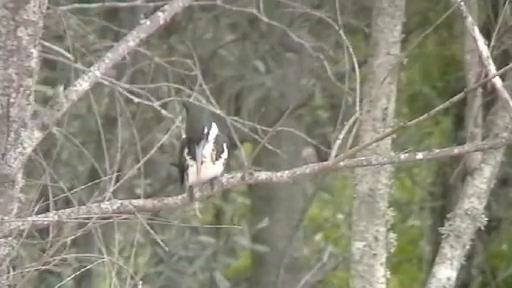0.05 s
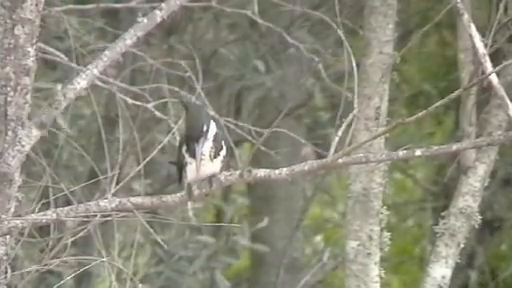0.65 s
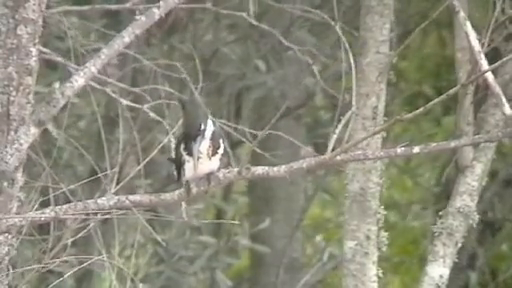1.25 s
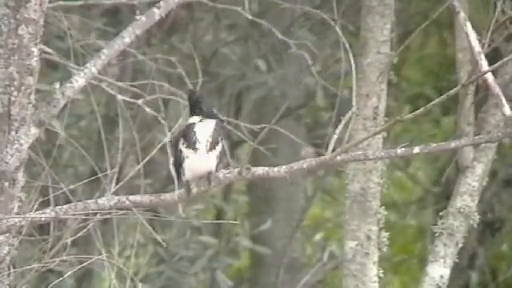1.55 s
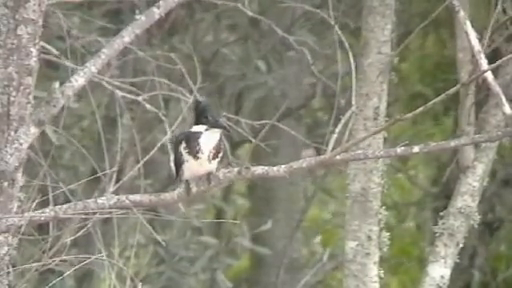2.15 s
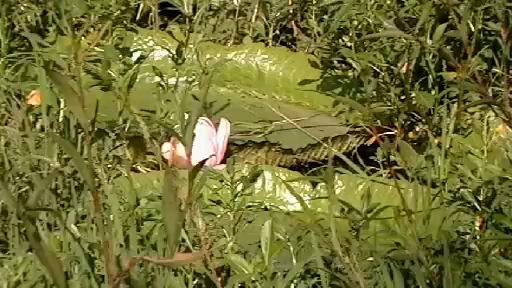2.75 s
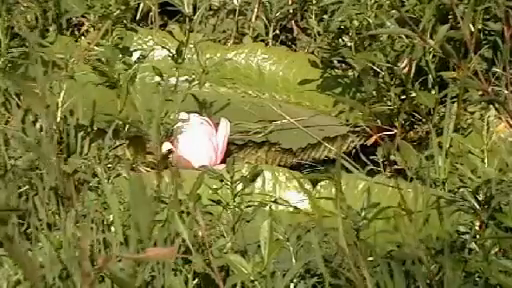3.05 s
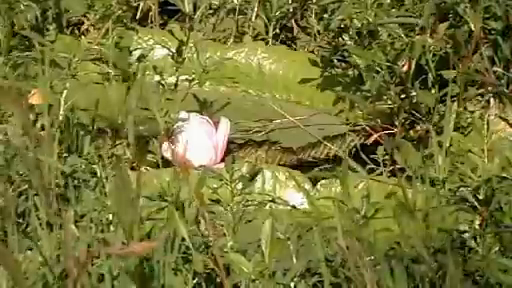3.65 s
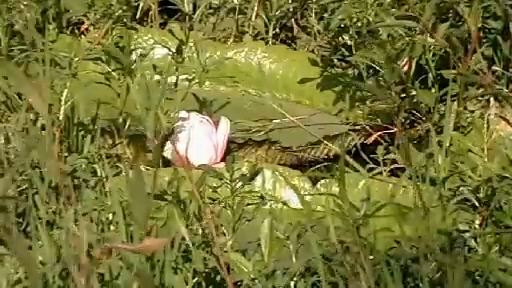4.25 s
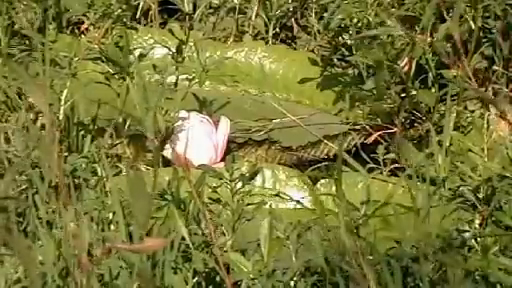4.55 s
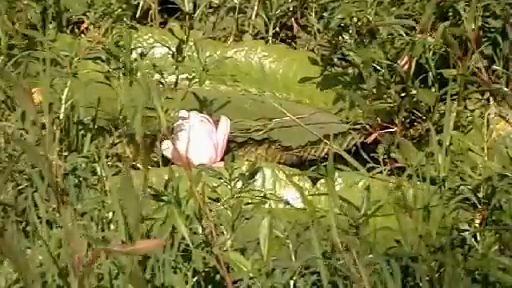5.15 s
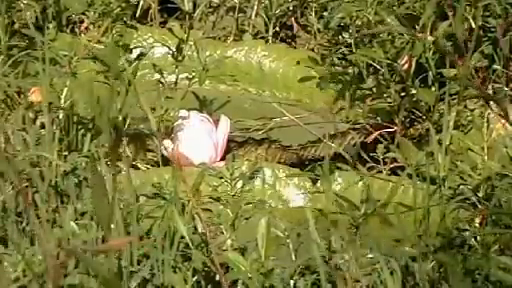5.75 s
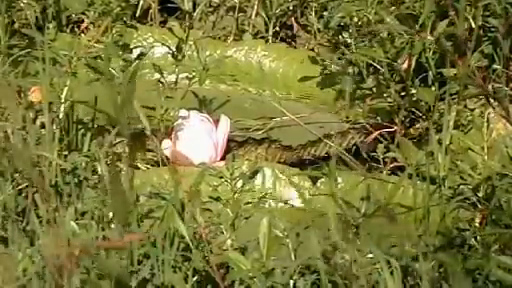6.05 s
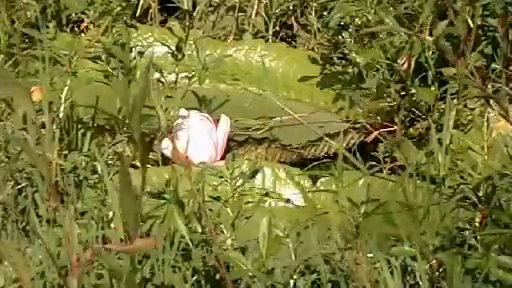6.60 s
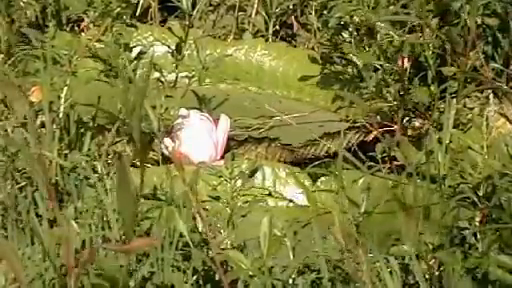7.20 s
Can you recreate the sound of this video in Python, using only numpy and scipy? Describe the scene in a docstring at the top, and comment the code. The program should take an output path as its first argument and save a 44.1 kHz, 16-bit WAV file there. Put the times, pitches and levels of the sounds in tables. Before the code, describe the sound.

The sound opens quietly among trees on a river bank, with a distant insect chorus making a steady, high hiss over soft outdoor air. At about 1.7 seconds a bird gives one short, harsh chirp that stands out clearly. Near 2.7 seconds everything cuts out for an instant.

Then, by the water, a close insect buzzes louder, very high and rapidly pulsing, over a rasping chorus until the end at about 7.5 seconds. Wind hits the microphone with low rumbles and thumps, loudest from 2.8 to 3.6 seconds, lighter around 4.3, and returning in uneven gusts from 5.1 to 6.7. A far bird whistles a faint run of quickening, falling notes from about 2.8 to 5 seconds, and others add two soft downward slides. A katydid gives brief, thin lisps a little more than once a second. A faint camera motor whine runs through both places.

```python
"""A far insect chorus hisses among trees on a river bank, and a bird gives one harsh chirp by snapping
its voice box. After a brief silence we are by the water lilies: a close insect buzzes as a muscle
clicks its ribs, others rasp, a katydid lisps with its wings and small birds whistle far off.
Gusts rumble as swirls of air hit the microphone.
The faint whine of the camera's motor runs through both spots."""
import sys
import numpy as np
from scipy import signal
from scipy.fft import rfft, irfft, next_fast_len
from scipy.io import wavfile
from scipy.ndimage import uniform_filter1d

SR = 44100
rng = np.random.default_rng(int(sys.argv[2]) if len(sys.argv) > 2 else 0)


def store_pcm(level_fs):
    """Save levels as 16-bit WAV."""
    pcm = np.round(np.clip(level_fs, -1, 1) * 32767).astype(np.int16)
    wavfile.write(sys.argv[1], SR, np.atleast_2d(pcm).T)


N = 329427
T = np.arange(N) / SR
FFT_SIZE = next_fast_len(N, real=True)
FREQS = np.maximum(np.arange(FFT_SIZE // 2 + 1) * SR / FFT_SIZE, 1)

# WOOD is the spot among the trees, POND the one by the lilies.
# A relative_db column gives only a shape; the overall loudness is set where it is used.
# Far air, water and leaves: pitch_hz, level_db_per_hz
WOOD_AIR = [(25, -104), (70, -89.5), (130, -99), (200, -82.5), (300, -91.5), (360, -84.5), (460, -81),
            (590, -87.5), (750, -84), (1400, -86.5), (2500, -90), (4700, -97), (5400, -105), (6200, -105),
            (11000, -101), (16000, -113)]
POND_AIR = [(25, -99), (90, -72), (170, -85), (320, -88.5), (570, -89), (730, -85), (1000, -89),
            (3500, -94), (4450, -87.5), (4950, -104), (5600, -107), (7000, -94), (10500, -106),
            (11300, -93.5), (12400, -92), (13800, -97), (16000, -92)]
# Far insect choruses: pitch_hz, level_db_per_hz
WOOD_CHORUS = [(5400, -115), (6200, -84), (6750, -77), (7250, -89), (7900, -84.5), (8600, -86), (9000, -92),
               (9700, -112)]
POND_CHORUS = [(5600, -112), (6100, -89.5), (6300, -99), (7000, -89.5), (7400, -78), (7680, -68.5),
               (7880, -73), (8055, -62), (8180, -70), (8300, -63.5), (8550, -77.5), (9020, -89),
               (9250, -82.5), (9550, -83.5), (10200, -108)]
# How wide the far sounds spread in stereo: pitch_hz, side_minus_mid_db
WOOD_WIDTH = [(60, -12), (380, -17.5), (700, -12), (4400, -10.5), (7000, -13.5), (15000, -11)]
POND_WIDTH = [(100, -8), (380, -12), (1300, -5), (2800, -9.5), (4400, -8), (6600, -2), (8200, -10.5),
              (9400, -2), (15000, -3)]
# Tones of the camera's motor: pitch_hz, wood_level_db, pond_level_db
WHINE_TONES = [(1499, -63.5, -66.5), (1798, -82, -67.5), (2098, -68.5, -66), (2547, -71, -75),
               (3297, -77, -76)]
# A lower chorus joining in among the trees: time_s, relative_db
LOW_CHORUS_LEVEL = [(0, -9), (.9, -6), (1.3, -0.5), (2.0, 1.5), (2.75, -3)]
# Where the far raspers' bodies ring: pitch_hz, width_hz, relative_db
RASP_BODY = [(6495, 200, 1.5), (6840, 190, 0.5)]
# A far bird's run of notes, softer in the middle: time_s, level_db
RUN_LEVEL = [(2.75, -55), (3.05, -54), (3.35, -60), (3.6, -61), (3.85, -59.5), (4.55, -61.5), (4.82, -57),
             (5.03, -56.5)]
# Long sliding notes of other birds: start_s, length_s, start_hz, end_hz, level_db
SLIDES = [(4.44, .22, 4130, 3600, -59), (7.34, 0.18, 2004, 1850, -57)]
# Katydid lisps: start_s, length_s, relative_db
LISPS = [(2.74, 0.21, -48.5), (3.40, 0.13, -47.5), (3.98, 0.16, -53), (4.598, 0.088, -45.5),
         (5.27, .135, -50), (6.055, 0.11, -49.5), (6.81, 0.14, -53), (7.40, .12, -56)]
# Tone colour of the wind's rumble: pitch_hz, relative_db
RUMBLE_COLOUR = [(20, -32), (50, -18), (90, -3.5), (150, -1.5), (220, 2.2), (320, -6.5), (450, -12.5),
                 (600, -20), (1000, -25), (1600, -33), (3000, -51)]
# How much the rumble differs between left and right: pitch_hz, relative_db
RUMBLE_WIDTH = [(40, -1), (130, 0), (260, -2), (500, 0.5), (1500, -0.5)]
# Gusts on the microphone: start_s, hold_s, strength_db
GUSTS = [(0.677, .015, -60.5), (.78, .02, -59), (0.976, .02, -55.5), (2.778, 0.06, -29),
         (2.844, 0.11, -24.5), (2.933, 0.16, -29), (3.173, 0.42, -32.5), (3.68, 0.13, -43),
         (4.155, 0.22, -45.5), (4.338, 0.1, -40), (4.54, 0.68, -51.5), (5.138, .05, -36.5),
         (5.195, 0.26, -34), (5.686, .04, -41), (5.738, 0.033, -36), (5.855, 0.37, -42.5),
         (5.948, 0.15, -36.5), (6.368, 0.2, -42), (6.556, 0.13, -39.5), (7.233, 0.03, -55),
         (7.427, 0.015, -40.5)]
# Single swirls of air that slap the microphone: start_s, level_db
PUFFS = [(2.898, -28), (3.005, -33), (3.095, -28.5), (3.26, -38), (3.605, -39), (3.927, -37.5),
         (5.255, -39), (5.762, -35.5)]
# Tone colour of those puffs: pitch_hz, relative_db
PUFF_COLOUR = [(30, -32), (110, -11), (230, 8.5), (400, 0), (900, -12), (1600, -15), (3500, -60),
               (16000, -90)]
# Where the chirping bird's throat rings: pitch_hz, width_hz, relative_db
THROAT = [(1400, 300, -14.5), (2200, 200, -.5), (2780, 480, -1.5), (3580, 250, -10), (4400, 400, -21),
          (5150, 400, -22)]
# The chirp's two clear beats: start_s, hold_s, level_db
CHIRP_BEATS = [(1.6865, .004, -30.5), (1.7035, .003, -24)]
# The weaker rattle under those beats: time_s, relative_db
RATTLE_LEVEL = [(1.674, -39), (1.688, -28.5), (1.693, -41), (1.697, -32.5), (1.707, -31), (1.714, -39),
                (1.721, -39), (1.735, -52)]
# Where the buzzing insects' bodies ring: pitch_hz, width_hz, relative_db
WOOD_BODY = [(8620, 93, 0)]
POND_BODY = [(8090, 93, 0.5), (8370, 180, 3), (8560, 430, -12)]
# Pace of their buzzing muscles: time_s, strokes_per_s
WOOD_PACE = [(0, 66.5)]
POND_PACE = [(2.75, 62.62), (4.7, 62.6), (5.6, 62.48), (7.47, 62.25)]
# How the buzz grows and fades: time_s, relative_db
WOOD_BUZZ_LEVEL = [(0, -54), (.5, -55), (1.1, -55), (1.45, -49.5), (1.75, -51.5), (1.9, -60), (2.75, -59)]
POND_BUZZ_LEVEL = [(2.75, -39), (4.1, -38), (4.25, -42), (4.9, -39), (5.0, -41), (5.75, -39.5),
                   (6.05, -41.5), (6.3, -38), (6.5, -41), (6.88, -39.5), (7.1, -41), (7.47, -39)]
# Brief chance peaks in the loudness of the steady close buzz: time_s, boost_db
BUZZ_PEAKS = [(4.767, 4), (4.895, 4.5), (5.742, 4.5), (5.807, 3.5)]


def undb(db):
    """Turn decibels into a number to multiply by."""
    return 10 ** (np.asarray(db) / 20)


def unit(x):
    """Scale a sound to an average power of 1."""
    return x / np.sqrt(np.mean(x ** 2) + 1e-20)


def curve(rows):
    """Join (time_s, value) rows by straight lines."""
    return np.interp(T, *np.transpose(rows))


def gains(rows):
    """Turn (pitch_hz, level_db) rows into a gain for every frequency."""
    hz, db = np.transpose(rows)
    return undb(np.interp(np.log(FREQS), np.log(hz), db))


def shape(x, response):
    """Filter a sound: multiply each frequency by its own gain."""
    return irfft(rfft(x, FFT_SIZE) * response, FFT_SIZE)[..., :N]


def white():
    """Plain, even hiss (white noise)."""
    return rng.standard_normal(N)


def wander(rate_hz):
    """A random drift, about 1 in size, that heads for a new value rate_hz times a second."""
    targets = rng.standard_normal(size=4096)
    return np.interp(T * rate_hz, np.arange(len(targets)), targets) * np.sqrt(3 / 2)


def swell(start_s, hold_s, db, rise_s, fall_s):
    """A loudness curve that builds up to start_s, holds, then dies away."""
    return undb(db) * np.exp(np.minimum(T - start_s, 0) / rise_s - np.maximum(T - start_s - hold_s, 0) / fall_s)


def ring(x, modes):
    """Let a sound ring a body at its own pitches; the result has power 1."""
    response = sum(undb(db) / (1 + 1j * (FREQS / hz - hz / FREQS) * hz / width) ** 2
                   for hz, width, db in modes)
    return unit(shape(x, response))


def stereo(mid, side):
    """Make left and right from what they share (mid) and how they differ (side)."""
    return np.array([mid + side, mid - side])


def echo(x, decay_s):
    """A blur of echoes from leaves and trunks that fades by 60 dB in decay_s."""
    t = T[:SR // 2]
    tail = rng.standard_normal(len(t)) * np.exp(-np.log(1000) * t / decay_s)
    return signal.fftconvolve(x, tail / np.linalg.norm(tail))[:N]


def outdoors(x, decay_s, echo_db, side_db):
    """Put the direct sound in the middle and its echoes around it."""
    return stereo(x + undb(echo_db) * echo(x, decay_s), undb(side_db) * echo(x, decay_s))


def far_hiss(spectrum, width, flicker_db, flicker_hz):
    """Countless far sources merge into a hiss; two sets of alternating bands flicker separately."""
    colour = gains(spectrum) * np.sqrt(SR / 2)
    octave_angle = np.pi * np.log2(FREQS)
    hiss = 0
    for bands in (np.cos(octave_angle), np.sin(octave_angle)):
        mid = shape(white(), colour * bands)
        side = shape(white(), colour * bands * gains(width))
        hiss = hiss + stereo(mid, side) * undb(flicker_db * wander(flicker_hz))
    return hiss


def motor_whine(column):
    """The camera's motor gives thin, slightly wavering tones; column picks the spot's levels."""
    whine = 0
    for row in WHINE_TONES:
        peak = np.sqrt(2) * undb(row[column] + 0.94 * wander(8.3))
        whine = whine + peak * np.sin(2 * np.pi * row[0] * T + 0.47 * wander(17))
    return whine


def low_chorus():
    """A thinner, lower insect chorus: a broad hiss with one narrow peak."""
    return ring(white(), [(5200, 3400, 0.5), (5170, 150, 2)]) * undb(curve(LOW_CHORUS_LEVEL) - 56)


def far_rasp(level_db=-61, side_db=-2, rough_db=4, rough_hz=65):
    """A few far insects rasp unevenly, pitched just below the main chorus."""
    mid, side = (ring(white(), RASP_BODY) * undb(rough_db * wander(rough_hz)) for _ in range(2))
    return stereo(mid, undb(side_db) * side) * undb(level_db)


def whistles(notes, bend, waver, flutter_db, echo_db):
    """Wavering, falling bird notes blurred by the trees; with bend over 1 they drop ever faster."""
    song = np.zeros(N)
    quiver = 1 + waver * wander(300)
    for start_s, length_s, start_hz, end_hz, db in notes:
        during = (T >= start_s) & (T < start_s + length_s)
        progress = np.clip((T[during] - start_s) / length_s, 0, 1)
        pitch_hz = (start_hz + (end_hz - start_hz) * progress ** bend) * quiver[during]
        arch = 2 * np.sqrt(progress * (1 - progress))
        song[during] += undb(db) * arch * np.sin(2 * np.pi * np.cumsum(pitch_hz) / SR)
    return outdoors(song * undb(flutter_db * wander(110)), decay_s=.25, echo_db=echo_db, side_db=-9)


def run_notes(start_s=2.748, count=10, first_gap_s=.284, gap_shrink_s=.0078, fall_ratio=.79):
    """List a bird's falling notes, which come ever sooner, shorter and lower."""
    lengths_s, pitches_hz = np.linspace(.097, .052, count), np.linspace(3210, 2970, count)
    notes = []
    for k, (length_s, hz) in enumerate(zip(lengths_s, pitches_hz)):
        level_db = np.interp(start_s, *np.transpose(RUN_LEVEL))
        notes.append((start_s, length_s, hz, hz * fall_ratio, level_db))
        start_s += first_gap_s - k * gap_shrink_s
    return notes


def far_birds():
    """One far bird sings a ragged run of steep notes; two others each slide evenly down."""
    run = whistles(run_notes(), bend=1.45, waver=.026, flutter_db=3.2, echo_db=-3.5)
    return run + whistles(SLIDES, bend=1, waver=.008, flutter_db=2.2, echo_db=-10)


def katydid(stroke_hz=110, depth=0.15, fade_s=0.074):
    """Quick wing strokes make short, very high lisps that swell and fade softly."""
    phrases = sum(undb(db) * np.clip(np.minimum(T - start, start + length - T) / fade_s + .5, 0, 1)
                  for start, length, db in LISPS)
    strokes = 1 + depth * np.sin(2 * np.pi * stroke_hz * T)
    rasp = ring(white() * strokes, [(11700, 3000, 0)]) * undb(-5)
    return stereo(rasp, undb(-4) * echo(rasp, decay_s=.05)) * phrases


def wind(brighten, shake_db, side, lean_left_db, calm_db=-71.5):
    """Swirls of air shake the microphone; stronger gusts shed smaller swirls, which sound higher."""
    strongest = np.max([swell(*gust, rise_s=0.022, fall_s=0.08) for gust in GUSTS], axis=0)
    gust_db = 20 * np.log10(strongest + undb(calm_db))
    noise = stereo(white(), side * shape(white(), gains(RUMBLE_WIDTH)))
    rumble = unit(shape(noise, gains(RUMBLE_COLOUR) / (1 + (FREQS / 3500) ** 4)))
    # split into swirl sizes at 165 Hz and 310 Hz
    large = shape(rumble, 1 / (1 + (FREQS / 165) ** 6))
    medium = shape(rumble, 1 / (1 + (FREQS / 310) ** 6)) - large
    small = rumble - large - medium
    tilt_db = brighten * np.clip(gust_db + 35, -12, 8)
    balance = undb(np.array([[lean_left_db], [-lean_left_db]]) / 2)
    swirls = (large * balance * undb(-1.2 * tilt_db)
              + medium * undb(0.53 * tilt_db)
              + small * undb(0.44 * tilt_db + 1.3 * wander(90)))
    return swirls * undb(gust_db + shake_db * wander(60))


def wind_puffs(hold_s=0.0055, side=0.64):
    """Single swirls slap the microphone: short puffs, brighter than the rumble."""
    loudness = sum(swell(start_s, hold_s, db, rise_s=0.0027, fall_s=0.014) for start_s, db in PUFFS)
    return unit(shape(stereo(white(), side * white()), gains(PUFF_COLOUR))) * loudness


def harsh_chirp(snap_hz=427.8, jitter=.15, rough=0.35, rasp_s=0.0024, tone_hz=2850):
    """Raspy snaps of a bird's voice box ring its throat; on two beats a clear tone breaks through."""
    start_s, end_s = RATTLE_LEVEL[0][0], RATTLE_LEVEL[-1][0]
    times_s = start_s + (np.arange(64) + jitter * rng.standard_normal(size=64)) / snap_hz
    hits = (times_s[times_s < end_s] * SR).astype(int)
    snaps = np.zeros(N)
    snaps[hits] = undb(curve(RATTLE_LEVEL))[hits]
    trails = signal.lfilter([1], [1, -np.exp(-1 / (rasp_s * SR))], snaps)
    rasp = rough * trails * white() / np.sqrt(rasp_s * SR / 2)
    rattle = ring(snaps + rasp, THROAT)
    # make it as strong as a pure tone that peaks at the loudest snap
    rattle *= snaps.max() / np.sqrt(2 * uniform_filter1d(rattle ** 2, size=130).max())
    beats = sum(swell(*beat, rise_s=0.00084, fall_s=0.00097) for beat in CHIRP_BEATS)
    tone = np.sin(2 * np.pi * np.cumsum(tone_hz * (1 + .025 * wander(500))) / SR)
    return outdoors(rattle + beats * tone, decay_s=0.22, echo_db=-15, side_db=-23)


def insect_buzz(pace, body, stroke_at_s, rib_hz, rib_db, uneven_db):
    """Each muscle stroke lets out a burst: one rib's clear ring plus dense clicks in the body."""
    stroke_hz = curve(pace) * (1 + .001 * wander(5))
    count = np.cumsum(stroke_hz) / SR
    # distance from the middle of the nearest stroke, in strokes; one is centred on stroke_at_s
    offset = (count - np.interp(stroke_at_s, T, count) + .5) % 1 - .5
    burst = np.exp(-.5 * (offset / .21) ** 4)  # flat-topped, about half a stroke long
    clicks = (rng.random(N) < 2500 / SR) * np.sign(white())  # about 2500 a second
    rib = np.sqrt(2) * np.sin(2 * np.pi * rib_hz * offset / stroke_hz + .5 * wander(40))
    song = ring(clicks, body) + undb(rib_db) * rib
    # the muscle gives every stroke nearly the same energy
    strength = np.sqrt(uniform_filter1d(song ** 2, size=300) + 1e-9)
    return unit(song / strength * burst * undb(uneven_db * wander(stroke_hz.mean())))


def close_insect(peak_reach_s=.012):
    """The insect by the lilies buzzes steadily, with a few brief chance peaks in loudness."""
    buzz = insect_buzz(POND_PACE, POND_BODY, stroke_at_s=4.895, rib_hz=8300, rib_db=-1.5, uneven_db=1.4)
    boost_db = sum(db * np.exp(-((T - time_s) / peak_reach_s) ** 4) for time_s, db in BUZZ_PEAKS)
    buzz *= undb(curve(POND_BUZZ_LEVEL) + boost_db)
    return outdoors(buzz, decay_s=0.092, echo_db=-21, side_db=-26)


def wood():
    """Among the trees: far choruses, one faint buzzing insect, a light breeze and a chirp."""
    air = far_hiss(WOOD_AIR, WOOD_WIDTH, flicker_db=1, flicker_hz=8.4)
    chorus = far_hiss(WOOD_CHORUS, WOOD_WIDTH, flicker_db=1, flicker_hz=55)
    low = low_chorus()
    buzz = insect_buzz(WOOD_PACE, WOOD_BODY, stroke_at_s=0, rib_hz=8580, rib_db=-4, uneven_db=1.5)
    buzz *= undb(curve(WOOD_BUZZ_LEVEL) - 6)
    breeze = wind(brighten=0.44, shake_db=2, side=0.079, lean_left_db=0.5)
    insects = outdoors(buzz + low, decay_s=0.079, echo_db=-3.5, side_db=-8.5)
    return air + chorus + insects + breeze + harsh_chirp() + motor_whine(column=1)


def pond():
    """By the lilies: a close insect over its chorus, far raspers, a katydid, far birds and gusts."""
    air = far_hiss(POND_AIR, POND_WIDTH, flicker_db=1.4, flicker_hz=8)
    chorus = far_hiss(POND_CHORUS, POND_WIDTH, flicker_db=1.07, flicker_hz=440)
    buzz = close_insect()
    gusts = wind(brighten=0.55, shake_db=2.03, side=0.76, lean_left_db=3.5)
    return (air + chorus + far_rasp() + buzz + gusts + wind_puffs()
            + katydid() + far_birds() + motor_whine(column=2))


def scene(silence_from_s=2.669, silence_to_s=2.719, pond_from_s=2.746):
    """The trees, a moment of near silence, then the lilies."""
    pond_share = np.clip((T - pond_from_s) * 200, 0, 1)
    outside_silence_s = np.maximum(silence_from_s - T, T - silence_to_s)
    volume = np.clip(outside_silence_s * 300 + .5, .003, 1)
    return volume * ((1 - pond_share) * wood() + pond_share * pond())


def record(dry, dip_hz=5400, dip_width_hz=700, dip_db=-14, top_hz=15750):
    """The camera softens a narrow band of treble and cuts off the very highest sounds."""
    notched = signal.lfilter(*signal.iirnotch(dip_hz, dip_hz / dip_width_hz, fs=SR), dry)
    dipped = notched + undb(dip_db) * (dry - notched)
    return signal.sosfilt(signal.ellip(12, .1, 80, top_hz, fs=SR, output="sos"), dipped)


dry = scene()
out = record(dry)
store_pcm(out)
```